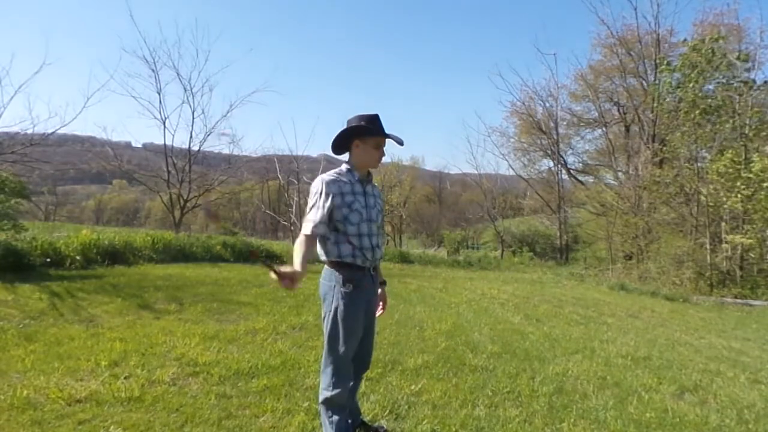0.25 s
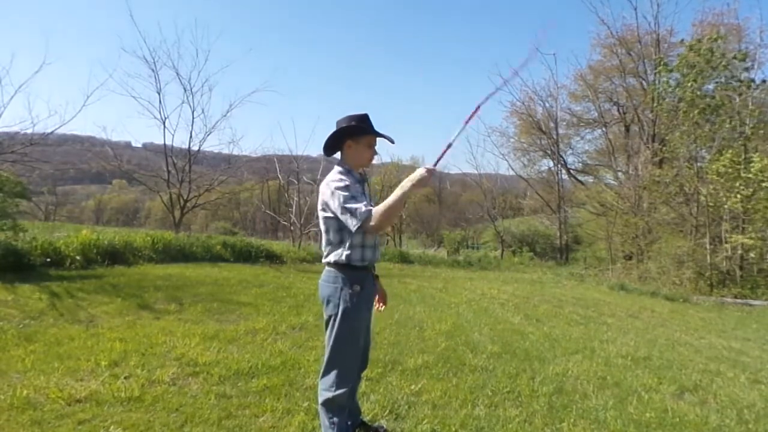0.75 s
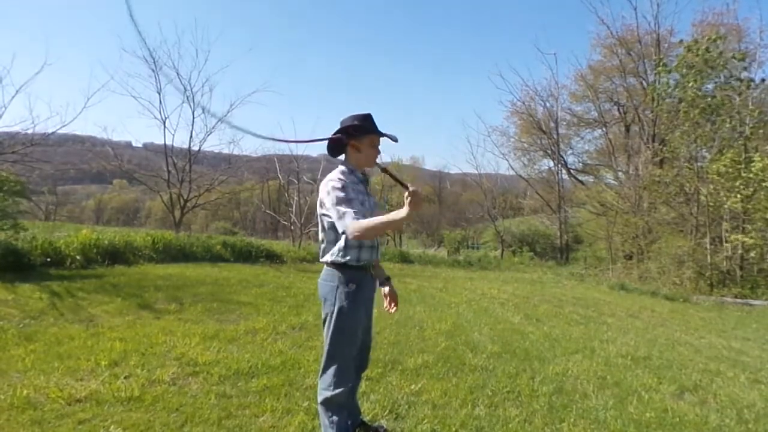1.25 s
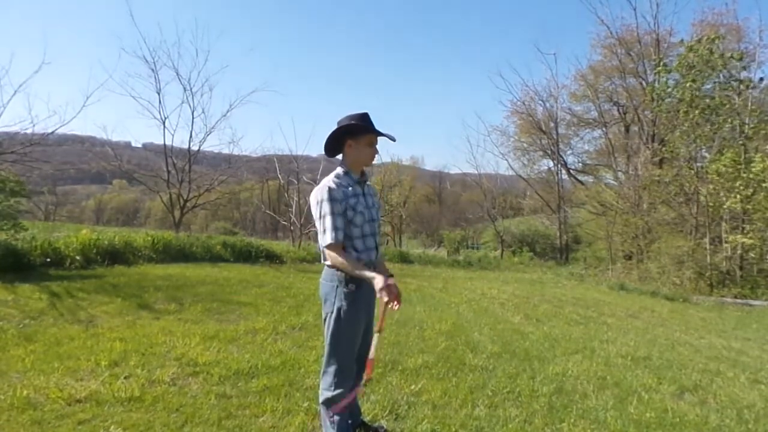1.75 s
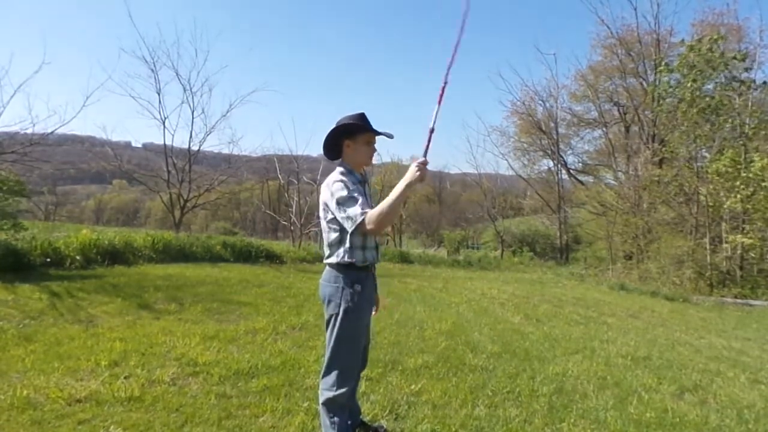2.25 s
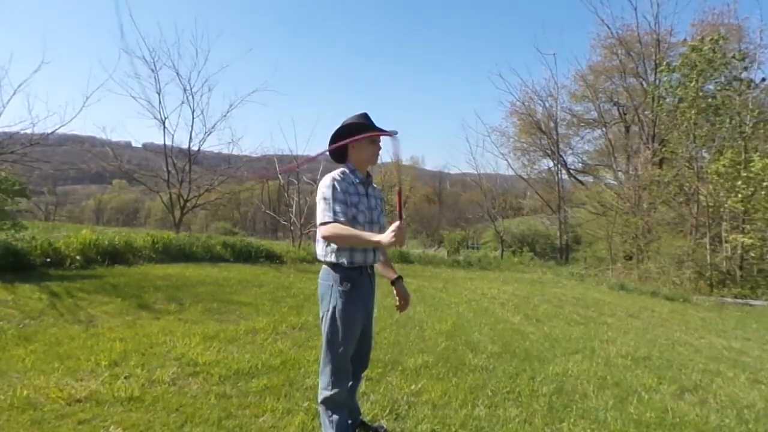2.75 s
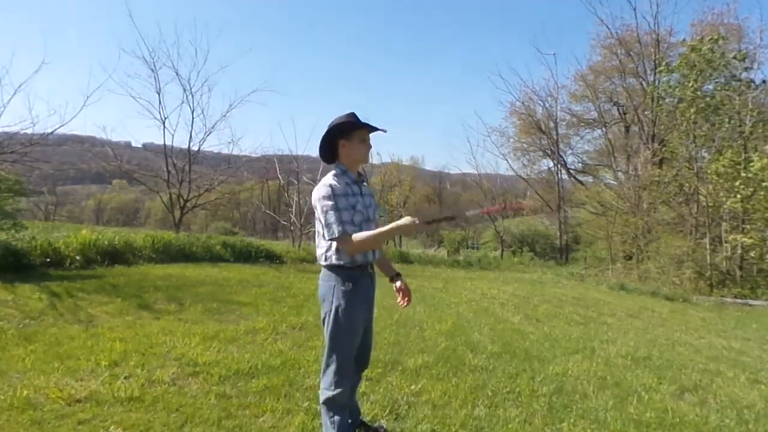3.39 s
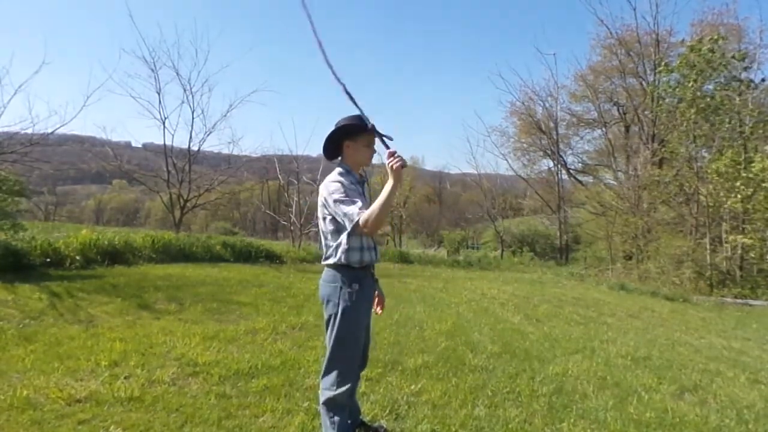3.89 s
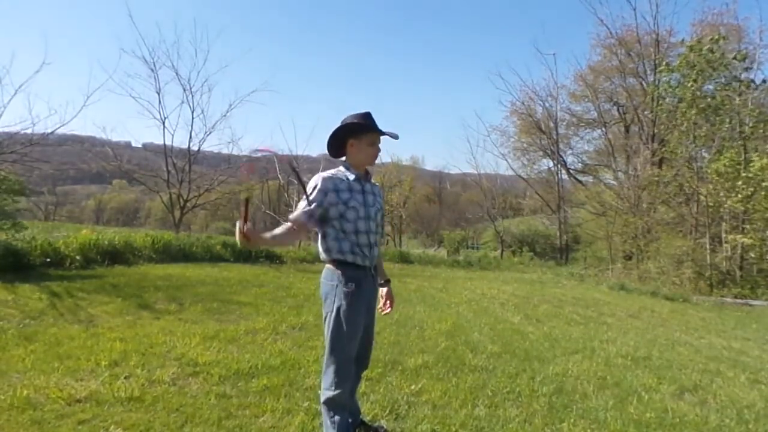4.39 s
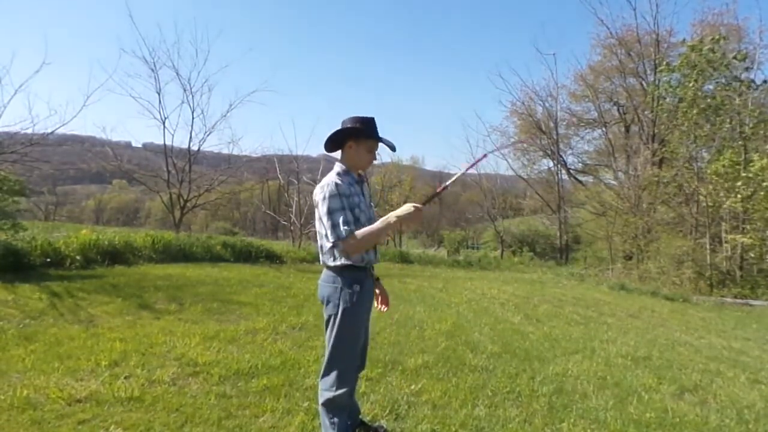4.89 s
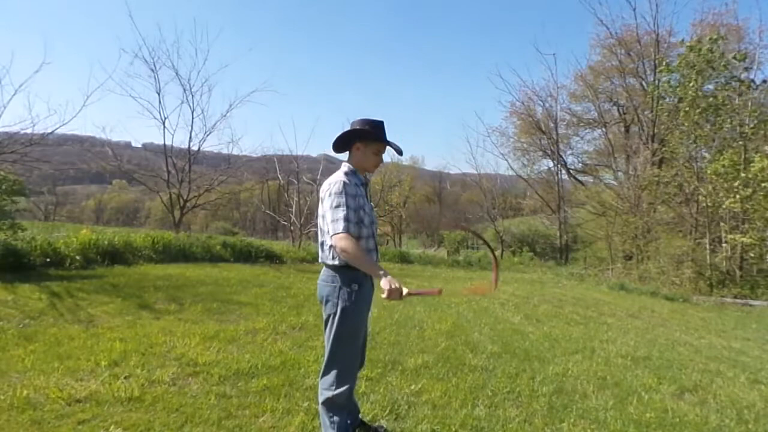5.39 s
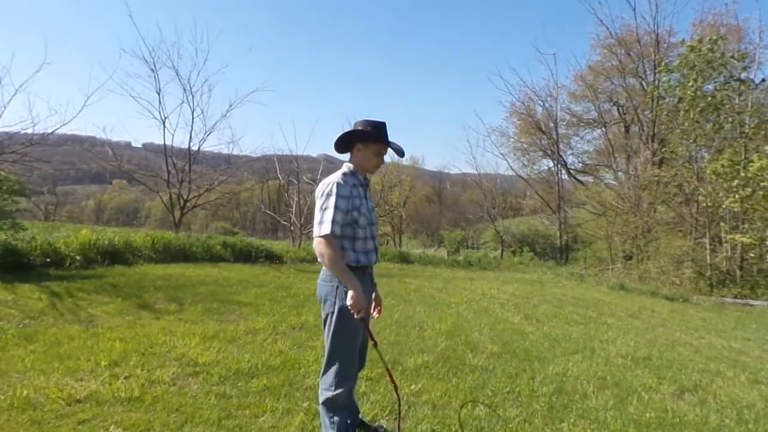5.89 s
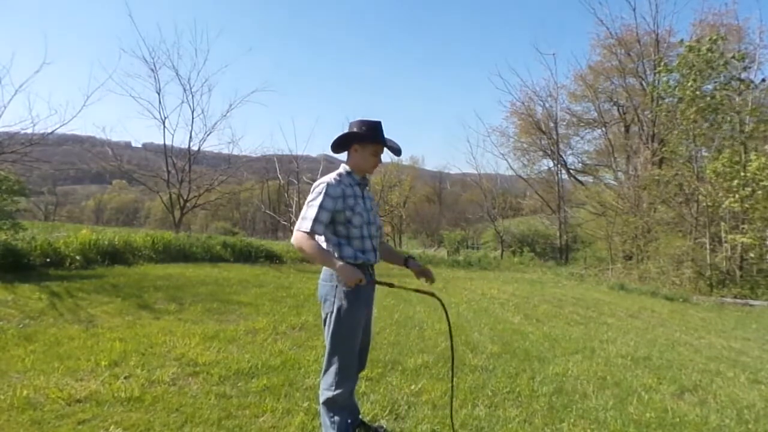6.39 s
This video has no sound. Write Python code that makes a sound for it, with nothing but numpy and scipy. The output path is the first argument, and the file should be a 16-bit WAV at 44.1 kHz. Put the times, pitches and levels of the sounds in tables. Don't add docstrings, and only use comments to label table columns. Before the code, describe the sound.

An open field with trees nearby, heard through a bare microphone buffeted by gusty wind: continuous low rumble, flutter and dull thumps, with faint leafy hiss. A small bird gives a thin falling chirp at the very start. A whip lash hisses and whistles, then cracks at 0.27 and, harder and nearer, 0.49 seconds. Wind swells around 1 to 1.4. Another pair snaps at 1.64 and 1.84, the second duller. Strong swishes lead to the loudest pair at 3.08 and 3.3, piercing and slightly overloaded. A fourth pair follows at 4.48 and 4.67, then a single crack at 5.69. Each is a tiny bright snap with a clumpy burst of echoes from ground, bushes and trees, fading within fractions of a second. Light grass taps and airy whistles fall between strokes. From about 5.9, faint hiss and heavier gusts remain, strongest near 6.4 to 6.6.

```python
import sys
import numpy as np
from scipy import signal
from scipy.fft import rfft, irfft, next_fast_len
from scipy.io import wavfile
from scipy.ndimage import uniform_filter1d

SR = 44100
rng = np.random.default_rng(int(sys.argv[2]) if len(sys.argv) > 2 else 0)


def boost_factor(decibels):
    exponent = np.asarray(decibels, float) / 20
    return 10 ** exponent


def store_pcm(level_fs):
    pcm = np.round(np.clip(level_fs, -1, 1) * 32767).astype(np.int16)
    wavfile.write(sys.argv[1], SR, np.atleast_2d(pcm).T)


N = 293088

# frequency in Hz, level in dB per Hz.
FIELD_COLOUR = [(590, -30.5), (1000, -3), (1910, -19.5), (3670, -30), (7790, -34.5), (12700, -33),
                (15000, -33), (15800, -44)]
# frequency in Hz, gain in dB.
MICROPHONE_COLOUR = [(300, 0), (5600, 2.8), (7800, -3), (10000, 0), (12500, 3.5), (14500, -0.5),
                     (15700, -5), (16300, -27)]

# start in seconds, hold in seconds, rumble in dB, flutter in dB.
GUSTS = [(0.0, .15, -23.5, -37), (0.296, .04, -19, -31), (0.376, .09, -18, -23.5), (.56, .24, -20, -37),
         (0.889, .29, -15.5, -29.5), (1.225, 0.081, -17, -25), (1.44, .04, -13, -25.5),
         (1.551, .08, -20, -38), (1.8, .17, -27, -44), (1.87, .07, -30, -31), (2.025, .105, -20, -26),
         (2.331, .09, -26.5, -33), (2.465, .15, -24, -31.5), (2.692, .09, -21, -34.5),
         (2.858, .06, -23.5, -40.5), (2.952, .15, -16.5, -36), (3.151, .14, -26, -48),
         (3.491, .22, -21.5, -39), (3.829, .06, -25.5, -35), (3.94, .12, -29.5, -41),
         (4.165, .06, -17, -33), (4.299, .07, -16, -29), (4.514, .06, -13, -24), (4.641, .36, -18, -23),
         (5.045, .03, -17, -23), (5.12, .17, -23, -43), (5.475, .07, -16, -31), (5.651, .23, -19, -36),
         (6.045, .085, -15, -31), (6.31, .18, -13.5, -29), (6.589, .08, -10, -23), (1.649, .12, -27.5, -52),
         (2.17, .09, -26, -46), (3.38, .06, -27, -50), (4.4, .08, -34, -33), (5.93, .05, -22.5, -41),
         (6.201, .08, -22, -42.5), (6.509, .05, -19.5, -39), (2.284, .015, -34, -40)]
HEAVE_DB = [-3.5, 4.5, 0, 0, -2.5, 0, 0.5, 2.5, -6, -4, -1, -9, -2, -5, 0, 0.5, 2.5, -10, -1, -13.5, 3, 0,
            -2, -7.5, -5.5, -9.5, 0.5, 3.5, 1, 2, 6, 4.5, -4, 1, -8.5, 0, -3, 6, -4]
# time in seconds, depth in dB.
LULLS = [(.085, 12), (.17, 4), (1.73, 5), (1.79, 4), (2.26, 4.5), (3.23, 3), (3.53, 3), (3.73, 5),
         (3.94, 4), (4.08, 3), (4.78, 4), (5.12, 4), (5.27, 5), (5.62, 2), (5.78, 3), (6.025, 7), (6.19, 4),
         (6.24, 3), (.22, 1), (.84, 2), (1.372, 2.5), (2.0, 5), (2.31, 10), (2.441, 10), (2.54, 5),
         (2.82, 8), (3.46, 5), (3.8, 5), (4.13, 8), (4.275, 12), (4.41, 4), (4.45, 2), (4.96, 2), (5.02, 5),
         (5.33, 3), (5.99, 2), (6.15, 5), (6.35, 4), (6.515, 5), (6.555, 6)]
# frequency in Hz, level in dB per Hz.
EDDY_COLOUR = [(28, -24), (50, -14), (90, 0.5), (130, -3), (250, -10.5), (400, 13.5), (700, -11),
               (1200, -21), (2000, -42), (3200, -57)]
# time in seconds, peak in dB at full height.
BUFFETS = [(.293, -7.5), (.384, -3), (.426, -3), (.922, -6.5), (1.012, -2.5), (1.142, -2), (1.287, -4),
           (1.438, -0.5), (1.594, -4.5), (2.03, -6), (2.075, -7), (2.472, -8.5), (2.612, -8), (2.762, -7),
           (3.855, -8), (4.308, -2.5), (4.34, 0), (4.523, -6), (4.551, -2), (4.69, -4), (4.748, -5),
           (4.835, -3), (5.053, -2), (5.486, -8), (5.815, -8.5), (6.125, -3.5), (6.334, -2.5), (6.4, 1.5),
           (6.454, -1), (6.597, -0.5)]
# time in seconds, peak in dB at full height.
SWIRLS = [(.062, -11.5), (.549, -14), (.639, -12), (.888, -10), (.967, -9.5), (1.043, -7.5), (1.221, -6),
          (1.463, -5), (2.356, -13.5), (2.527, -9), (2.551, -11), (2.713, -12), (2.855, -12), (3.117, -7.5),
          (3.543, -10), (3.7, -17), (4.193, -13), (4.325, -8.5), (4.718, -4), (4.879, -5), (4.999, -5.5),
          (5.2, -9), (5.358, -17.5), (5.507, -9), (5.531, -10), (5.759, -8), (5.9, -18), (6.053, -9),
          (6.367, -6.5), (6.623, -3.5)]
# time in seconds, peak in dB at full height.
KNOCKS = [(.293, -22), (.308, -13.5), (.381, -14.5), (.645, -17.5), (.691, -18), (.741, -15.5),
          (.792, -19.5), (1.044, -12.5), (1.103, -13.5), (1.252, -17), (1.299, -15.5), (1.435, -20),
          (2.03, -10.5), (2.087, -13.5), (2.48, -13.5), (2.597, -16), (3.873, -20.5), (4.375, -7),
          (4.55, -6.5), (4.718, -9.5), (4.83, -11), (4.895, -1), (4.973, -15), (4.996, -19.5), (5.2, -19.5),
          (5.814, -10), (6.091, -15), (6.4, -8.5), (6.473, -9.5), (6.604, -3.5)]
# time in seconds, peak in dB at full height.
SLAPS = [(1.1, -21), (.645, -17), (.691, -18.5), (.741, -21), (1.9, -25), (2.527, -21), (4.372, -11),
         (4.997, -22), (5.814, -17), (.293, -22), (.792, -28), (2.502, -22), (2.551, -22), (5.2, -30),
         (4.228, -29), (4.44, -30), (1.81, -28), (1.86, -26), (1.912, -22), (2.131, -22.5), (2.392, -25),
         (2.703, -25), (4.814, -15), (4.74, -16), (1.172, -20), (1.1, -16.5), (5.092, -22), (5.897, -24)]
# time in seconds, peak in dB at full
TICKS = [(.381, -21), (.968, -21), (1.29, -33), (4.373, -32), (4.55, -26), (5.05, -33), (5.07, -36),
         (5.487, -30.5), (6.093, -37), (6.592, -23.5), (6.605, -25), (.922, -37), (1.01, -40), (1.043, -35),
         (1.07, -41), (1.102, -35), (1.125, -40), (1.16, -38), (1.175, -36.5), (1.232, -41), (1.278, -31.5),
         (2.481, -42), (2.5, -40), (2.61, -40), (4.83, -29), (4.868, -32), (5.059, -36), (5.093, -38),
         (5.946, -38), (6.399, -32), (6.413, -36.5), (6.475, -39), (6.484, -37), (6.646, -32)]
# time in seconds, peak of their top in dB.
PUFFS = [(.425, -22), (.869, -30), (.902, -24), (.964, -24), (1.003, -26), (1.03, -20), (1.122, -25),
         (1.14, -21), (1.218, -23), (1.283, -19), (1.944, -24), (2.1, -19), (2.109, -18), (2.144, -28),
         (3.113, -25), (4.037, -30), (4.184, -25), (4.305, -23), (4.323, -24), (4.339, -24), (4.784, -19),
         (4.876, -16), (4.932, -18), (5.03, -28), (5.046, -22), (5.132, -28), (5.286, -32), (5.527, -24),
         (5.552, -34), (5.872, -27), (6.322, -26), (6.365, -26), (6.461, -20), (6.588, -14), (4.903, -14),
         (4.978, -19), (4.76, -20), (4.944, -22), (1.06, -24), (1.2, -30)]

# start in seconds, length in seconds, from Hz, to Hz, level in dB.
CHIRPS = [
    (.032, .008, 8400, 5900, -65),
    (.058, 0.099, 8000, 3740, -65.5),
]

# start, rise and fall in seconds, level in dB.
SWISHES = [(.145, .013, 0.27, -60), (.455, .008, 0.08, -48), (.76, .012, .025, -54),
           (1.52, 0.031, 0.27, -56.5), (2.9, .13, 0.045, -50), (3.262, 0.016, 0.11, -41),
           (4.348, 0.055, 0.13, -52.5), (4.93, 0.016, .039, -53), (5.58, .024, 0.12, -61.5),
           (5.95, .26, .5, -62.5), (6.28, .03, 0.057, -61), (6.3, .25, .3, -65.5)]
# time in seconds, level in dB.
FLICKS = [(.202, -42), (.898, -61), (1.599, -42.5), (2.149, -43.5), (3.023, -37.5), (3.583, -38.5),
          (4.413, -45), (5.634, -45.5)]
# time in seconds, level in dB.
TAPS = [(.705, -52), (.722, -54), (.738, -54), (2.05, -54), (2.066, -52), (3.508, -52), (3.547, -46),
        (3.577, -40), (4.893, -57), (4.906, -59), (5.917, -53), (5.945, -53)]
# time in seconds, level in dB.
LEADS = [(.253, -40), (0.486, -30.5), (1.628, -41), (1.796, -55.5), (3.069, -31), (4.462, -36),
         (4.654, -35), (5.68, -40)]
# start in seconds, length in seconds, from Hz, level in dB.
RISING = [(.152, .035, 3300, -71), (.455, .016, 2300, -52), (0.754, 0.026, 2700, -49.5),
          (1.545, .02, 1850, -50.5), (1.579, 0.024, 1855, -45), (2.137, .0237, 2000, -48),
          (3.003, 0.031, 2000, -39), (3.265, .016, 2100, -45), (3.02, 0.013, 3200, -40.5),
          (4.375, 0.026, 1800, -52), (4.399, 0.023, 2200, -41), (4.39, .02, 1150, -53), ]
# start in seconds, length in seconds, from Hz, level in dB.
FALLING = [(.152, 0.066, 2700, -56), (.155, .075, 2200, -52.5), (1.555, .025, 2620, -47.5),
           (1.597, 0.024, 2000, -53), (2.975, 0.026, 2100, -48), (3.015, 0.06, 2300, -47),
           (3.0, .03, 1600, -49), (4.59, 0.054, 2700, -43), (.31, .03, 2800, -48.5),
           (4.419, 0.035, 2060, -52)]
# start in seconds, length in seconds, from Hz, to Hz, level in dB.
BREATHY = [(.455, .03, 3100, 2950, -43), (.468, .016, 2400, 2250, -45), (1.796, .036, 3400, 2450, -39),
           (3.262, .03, 3100, 2600, -38), (3.268, .022, 2300, 2200, -41), (4.625, .03, 3200, 2700, -43),
           (4.62, .03, 2000, 1900, -48), (4.934, .026, 2250, 2400, -46), (4.95, .01, 3000, 3900, -46),
           (4.958, .03, 2200, 1700, -55), (5.588, .016, 1950, 1850, -49), (5.605, .018, 1600, 1450, -52),
           (5.622, .018, 1800, 2000, -52), (5.62, .016, 1050, 1200, -53), (3.655, .04, 1800, 2100, -56)]
# seconds after the crack (negative is before), length in seconds, from Hz, to
# Hz, level in dB. The first two go with the cracks behind; the front one has no length and stays silent.
RECOIL = (.012, .024, 4000, 2900, -44)
BACK_SIZZLE = (-.014, .014, 3599.5, 5099.5, -39.5)
FRONT_SIZZLE = (0.1, 0, 2849.5, 4450, -39.5)

# time in seconds, strength in dB, capsule ring in dB, spread in ms, body in dB.
BACK_CRACKS = [
    (0.2671, -4, 4.5, 0.489, -14.5),
    (1.6415, 0, -1.5, 1, -15),
    (3.0815, 4, 1.5, 0.54, -12),
    (4.4767, -0.5, -2.5, 1.1, -15),
]
FRONT_CRACKS = [
    (.4949, 0, -1, .12, -22),
    (3.2977, 2.5, -5, .12, -20),
    (1.8384, 0, 5.5, .25, -9),
    (4.6653, -2, 4, .45, -13),
]
LAST_CRACK = [
    (5.6937, 0, -14.5, 1.07, -16),
]
# echo tilt in dB per octave, nearest ground in dB, edge in dB.
BACK_AIM = [(0, 0, -4), (0, 1, 0), (0, 2, 0), (0, 4, 0)]
FRONT_AIM = [(0, 3.5, 0), (1, 0, 0), (0, -0.5, 0), (1.2, -9, -6)]
LAST_AIM = [(0, 2, 0)]
# time in seconds, level in dB.
OVERLOADS = [
    (.4951, 0),
    (3.2979, 4),
]
# delay in seconds, level in dB.
BACK_GROUND, FRONT_GROUND, LAST_GROUND = (0.0044, -3.5), (.0054, -7), (0.00173, -5)

# delay in seconds, depth in seconds, dB per kHz at 5 kHz, tilt in dB per octave.
BACK_ECHO = [(.007, .007, -47.5, 3), (.034, .022, -54, 5.0), (.049, .005, -46, -6), (.058, .006, -51, -8),
             (.08, .006, -40, -3), (.096, .011, -41, -3.5), (.112, .006, -45, -6), (.135, .012, -55, -4.0)]
FRONT_ECHO = [(.010, .007, -40, 1), (.022, .007, -35.5, 2.5), (.039, .007, -33.5, 1.0),
              (.06, .028, -39, 0.4), (.1, .022, -39, -2.0), (.0385, .0015, -39, 0), (.063, .002, -36, -1),
              (.135, .03, -49, -1), (.24, .005, -58, -3)]
LAST_ECHO = [(.013, .006, -45, 0), (.028, .012, -54, 4), (.075, .012, -45.5, -3.0), (.044, .005, -38.5, -5),
             (.058, .012, -42.5, -4.0), (.095, .014, -42, -4.0), (.25, .004, -58, -7.0),
             (.285, 0.018, -62.5, -7.0)]
# start in seconds, dB per kHz at 5 kHz, tilt in dB per octave.
BACK_TAIL, FRONT_TAIL, LAST_TAIL = (0.11, -50, -4.5), (0.1, -47.5, -2.5), (.11, -51.5, -4.0)


def rms_one(x):
    return x / np.sqrt(np.mean(x ** 2) + 1e-20)


def at_hz(points, hz):
    points = np.array(points)
    return np.interp(np.log(hz), np.log(points[:, 0]), points[:, 1])


def colour(x, points):
    size = next_fast_len(N)
    gain = boost_factor(at_hz(points, np.fft.rfftfreq(size, 1 / SR) + 1))
    return irfft(rfft(x, size) * gain, size)[:N]


def band(x, low_hz, high_hz):
    return signal.sosfilt(signal.butter(2, [low_hz, high_hz], "band", fs=SR, output="sos"), x)


def drift(rate_hz):
    r = np.exp(-2 * np.pi * rate_hz / SR)
    wander = signal.lfilter([1], [1, -2 * r, r * r], rng.standard_normal(N + SR))
    return rms_one(wander[SR:])


def add(out, start_s, piece):
    i = round(start_s * SR)
    out[i:i + len(piece)] += piece[:N - i]


def glides(rows, width_hz):
    out = np.zeros(N)
    sway = drift(width_hz) + 1j * drift(width_hz)
    for s, length, from_hz, to_hz, db in rows:
        u = np.linspace(0, 1, round(length * SR))
        pitch_hz = from_hz * (to_hz / from_hz) ** u
        turn = np.exp(2j * np.pi * np.cumsum(pitch_hz) / SR)
        i = round(s * SR)
        swell = np.sqrt(np.sin(np.pi * u))
        add(out, s, boost_factor(db) * swell * np.real(turn * sway[i:i + len(u)]))
    return out


def field_hush():
    sway_db = .8 * drift(3)
    hiss = band(colour(rng.standard_normal(N), FIELD_COLOUR), 1500, 19000)
    return boost_factor(-64.5 + sway_db) * rms_one(hiss)


def gust_db(rows, lull_db, steeper):
    rise_db_per_s, fall_db_per_s, lull_s = 400, 200, .024
    t = np.arange(0, N + 64, 64) / SR
    power = boost_factor(lull_db) ** 2
    for s, hold, db in rows:
        below = rise_db_per_s * np.maximum(s - t, 0) + fall_db_per_s * np.maximum(t - s - hold, 0)
        power = power + boost_factor(db - steeper * below) ** 2
    dips = sum(depth_db * np.exp(-((t - s) / lull_s) ** 2) for s, depth_db in LULLS)
    return np.interp(np.arange(N) / SR, t, 10 * np.log10(power) - steeper * dips)


def eddies(rows, centre_hz, turns, under_db=-60):
    out = np.zeros(N)
    chances = rng.uniform(-0.9, 1, (len(rows), 2))
    for (s, db), (phase, scale) in zip(rows, chances):
        hz = centre_hz * 1.35 ** scale
        cycles = np.arange(-3 * SR // hz, 6 * SR // hz) * hz / SR
        side = np.where(cycles < 0, .8, 1.55)
        shape = np.exp(-(cycles / turns / side) ** 2)
        add(out, s - 3 / hz, boost_factor(db) * shape * np.cos(2 * np.pi * cycles + np.pi * phase))
        add(out, s - 3 / hz, boost_factor(db + under_db) * np.sqrt(shape) * np.cos(np.pi * (cycles + phase)))
    return out


def room_left(level_db, strong):
    carried = uniform_filter1d(strong ** 2, size=round(.05 * SR))
    whole = boost_factor(level_db) ** 2
    return np.sqrt(np.maximum(whole - carried, 0.55 * whole))


def random_eddies(flutter_db):
    hit = rng.random(N) < 260 * boost_factor(4 * drift(12)) / SR
    sizes = hit * boost_factor(4.15 * np.minimum(rng.exponential(1, N), 3))
    sharp = np.clip(rng.standard_normal(N), -2, 1.3)
    signs = rng.choice([-1, 1], (2, N))
    deep, low_part, high_part = np.zeros((3, N))
    edges = 25 * 2 ** np.arange(0, 7.3, .6)
    for k, (low, high) in enumerate(zip(edges, edges[1:])):
        hz = np.sqrt(low * high)
        pulses = sizes * signs[k % 2] * boost_factor(2.2 * sharp * np.log2(hz / 150))
        pulses = pulses + (0.075 if hz > 280 else .15) * sharp
        layer = band(band(pulses, low, high)[::-1], low / 1.3, high * 1.045)[::-1]
        layer = layer / np.sqrt(uniform_filter1d(layer ** 2, size=round(SR * (0.08 + 4 / hz))) + 1e-9)
        layer = layer * boost_factor(0.11 * (flutter_db + 32.5) * max(np.log2(hz / 400), 0))
        part = deep if hz < 105 else low_part if hz < 280 else high_part
        part += boost_factor(at_hz(EDDY_COLOUR, hz)) * np.sqrt(high - low) * layer
    return rms_one(deep), rms_one(low_part), rms_one(high_part)


def wind():
    under_db, lull_rumble_db = -1.5, -32.5
    gusts = np.array(GUSTS)
    rumble_rows = gusts[:, :3]
    heave_rows = rumble_rows + np.outer(HEAVE_DB, [0, 0, 1])
    rumble_db = gust_db(rumble_rows, lull_rumble_db, steeper=0.94)
    flutter_db = gust_db(gusts[:, [0, 1, 3]], lull_db=-52, steeper=1.5)
    heave_db = gust_db(heave_rows, lull_rumble_db, steeper=0.8)
    deep, low, high = random_eddies(flutter_db)

    buffets = eddies(BUFFETS, centre_hz=180, turns=.7) + eddies(SWIRLS, centre_hz=270, turns=0.69)
    knocks = eddies(KNOCKS, centre_hz=580, turns=.7)
    knocks = knocks + eddies(SLAPS, centre_hz=713, turns=0.55, under_db=under_db)
    ticks = eddies(TICKS, centre_hz=1380, turns=0.45, under_db=under_db + 6)
    puffs = boost_factor(-3) * eddies(PUFFS, centre_hz=560, turns=.55, under_db=under_db)
    t = np.arange(N) / SR
    first = -.14 * np.cos(2 * np.pi * 200 * t) * np.exp(-t / .005)

    rumble = room_left(rumble_db - 1.05, buffets) * low + boost_factor(heave_db - 10.5) * deep
    flutter = room_left(flutter_db + 3.0, knocks) * high
    total = rumble + flutter + buffets + knocks + ticks + first + puffs
    return .95 * np.tanh(total / .95)


def bird():
    return glides(CHIRPS, width_hz=260)


def swishes():
    rows = list(SWISHES)
    rows += [(s, .004, .009, db) for s, db in FLICKS]
    rows += [(s, .001, .0035, db) for s, db in TAPS]
    rows += [(s, .004, .014, db) for s, db in LEADS]
    level = np.zeros(N)
    for s, rise, fall, db in rows:
        t = np.arange(round((rise + 2 * fall) * SR)) / SR
        swell = np.minimum(t / rise, 1) ** 1.9
        add(level, s, boost_factor(db - 20 * np.maximum(t - rise, 0) / fall) * swell)
    hiss = colour(rng.standard_normal(N), [(900, -29), (2500, -0.5), (5000, -1.5), (12000, 0.5)])
    return level * rms_one(hiss) * boost_factor(1.2 * drift(250))


def around(cracks, glide):
    after, length, from_hz, to_hz, db = glide
    return [(row[0] + after, length, from_hz, to_hz, db + row[1]) for row in cracks]


def whistles():
    rise_octaves_per_s, fall_octaves = 22, .55
    rows = [(s, length, hz, hz * 2 ** (rise_octaves_per_s * length), db) for s, length, hz, db in RISING]
    rows += [(s, length, hz, hz * 2 ** -fall_octaves, db) for s, length, hz, db in FALLING]
    sizzles = around(BACK_CRACKS + LAST_CRACK, BACK_SIZZLE) + around(FRONT_CRACKS, FRONT_SIZZLE)
    return glides(rows, width_hz=190) + glides(sizzles, width_hz=900)


def breathy_whistles():
    return glides(BREATHY + around(BACK_CRACKS, RECOIL), width_hz=330)


def scatter(t, hz, reflectors):
    octaves = np.log2(hz / 5000)
    loss_db = .7 * octaves ** 2 + 12 * max(np.log2(1400 / hz), 0)
    power = 0
    for delay, depth, db, tilt in reflectors:
        air_db = 25 * delay * (hz / 1e4) ** 2
        away_db = 10 * (np.abs(t - delay) / depth) ** 1.3
        power = power + boost_factor(db + tilt * octaves - loss_db - air_db - away_db) ** 2
    return power


def valley(t, hz, tail):
    octaves = np.log2(hz / 5000)
    start, db, tilt = tail
    late = np.maximum(t - start, 0)
    swell = np.minimum(t / start, 1) ** 3.5
    tail_db_per_s = 120 * 2 ** (.55 * octaves)
    fading = boost_factor(-tail_db_per_s * late) ** 2 + boost_factor(-22 - 50 * late) ** 2
    return swell * fading * boost_factor(db + tilt * octaves - 1.5 * octaves ** 2) ** 2


def echoes():
    directions = ((BACK_CRACKS, BACK_AIM, BACK_ECHO, BACK_TAIL),
                  (FRONT_CRACKS, FRONT_AIM, FRONT_ECHO, FRONT_TAIL),
                  (LAST_CRACK, LAST_AIM, LAST_ECHO, LAST_TAIL))
    out = np.zeros(N)
    t = np.arange(0, round(.9 * SR), 8) / SR
    white = rng.standard_normal((2, N))
    shared = .7 * drift(150)
    clumps = [1.9 * drift(70) for _ in range(5)]
    edges = 500 * 2 ** np.arange(0, 5.1, .5)
    for k, (low, high) in enumerate(zip(edges, edges[1:])):
        power = np.zeros(N)
        hz = np.sqrt(low * high)
        for rows, aims, reflectors, tail in directions:
            near = scatter(t, hz, reflectors[:1]) * (t > .002)
            far = scatter(t, hz, reflectors[1:]) + valley(t, hz, tail)
            for row, (tilt_db, near_db, _) in zip(rows, aims):
                back = np.repeat(near * boost_factor(near_db) ** 2 + far, 8)
                add(power, row[0], back * boost_factor(row[1] + tilt_db * np.log2(hz / 5000)) ** 2)
        lumps = rms_one(boost_factor(shared + clumps[k // 2]))
        out += np.sqrt(power * (high - low) / 1000) * lumps * rms_one(band(white[k % 2], low, high))
    return out


def overloads():
    out = np.zeros(N)
    t = np.arange(round(.016 * SR)) / SR
    for s, db in OVERLOADS:
        swing = np.cos(2 * np.pi * 39 * t ** .8) * np.exp(-t / .006) * np.cos(np.pi / 2 * t / t[-1])
        add(out, s, boost_factor(db) * swing * (1 - np.exp(-t / .00005)))
    bounces = [(s + FRONT_GROUND[0], db - 17.5) for s, db in OVERLOADS]
    return out + eddies(bounces, centre_hz=1500, turns=.5)


def cracks():
    ring, edge, far_edge, body = np.zeros((4, N))
    t = np.arange(round(.016 * SR)) / SR
    lead = .003
    # sharp edge in dB, rattle of lesser shocks, ground bounce
    rows = [row + (-16.5, .16, BACK_GROUND) for row in BACK_CRACKS]
    rows += [row + (-6.5, 0, FRONT_GROUND) for row in FRONT_CRACKS]
    rows += [row + (-20.5, .16, LAST_GROUND) for row in LAST_CRACK]
    aims = BACK_AIM + FRONT_AIM + LAST_AIM
    noise = rng.standard_normal((len(rows), 3, len(t)))
    for row, aim, shocks in zip(rows, aims, noise):
        s, strength_db, ring_db, spread_ms, body_db, edge_db, rattle, (bounce_s, bounce_db) = row
        start = s - lead
        shape = np.exp(-np.abs(t - lead) / np.where(t < lead, .0003, spread_ms / 1000))
        shape += .05 * np.exp((t - lead) / .0015) * (t < lead)
        trail = shape + rattle * np.exp(-(t - lead) / .003) * (t > lead)
        add(ring, start, boost_factor(ring_db) * trail * shocks[0])
        sharp = far_edge if rattle else edge
        add(sharp, start, boost_factor(edge_db + strength_db + aim[2]) * trail * shocks[1])
        add(body, start, boost_factor(body_db) * shape * np.abs(shocks[2]))
        add(body, start + bounce_s, -boost_factor(body_db + bounce_db) * shape * np.abs(shocks[1]))
    bright = 0.86 * band(ring, 10800, 14600) + 2.2 * band(edge, 2500, 11300)
    bright = bright + 2.1 * band(far_edge, 4000, 11300)
    lag = round(.0054 * SR)
    delayed = np.concatenate([np.zeros(lag), bright[:-lag]])
    ground = boost_factor(-13) * colour(delayed, [(2500, 0), (6000, -7), (14000, -10)])
    return bright + ground + 2.6 * band(body, 350, 2300) + overloads()


def scene():
    background = field_hush() + wind()
    through_air = bird() + swishes() + whistles() + echoes()
    mix = background + colour(through_air, MICROPHONE_COLOUR) + breathy_whistles() + cracks()
    return mix[None]


def band_limit(x):
    return signal.sosfilt(signal.butter(12, 16510, fs=SR, output="sos"), x)


def record(dry):
    top = signal.cheby2(12, 60, 16600, fs=SR, output="sos")
    clipped = np.clip(dry[0], -.97, .97)
    settled = signal.sosfilt_zi(top) * clipped[0]
    cut = signal.sosfilt(top, clipped, zi=settled)[0]
    return band_limit(cut[None])


dry = scene()
out = record(dry)
store_pcm(out)
```